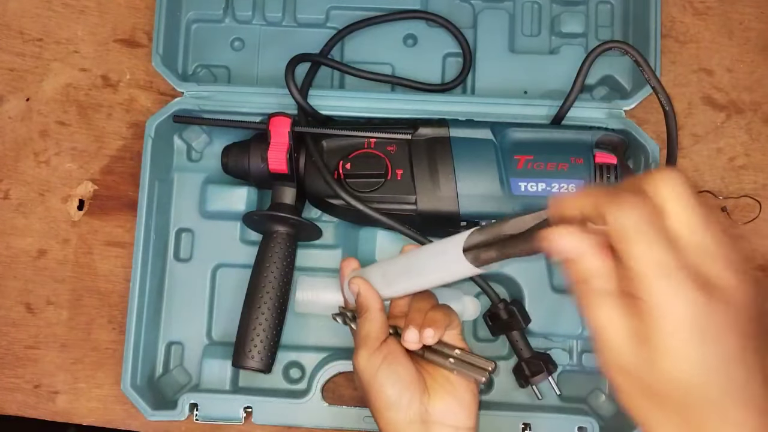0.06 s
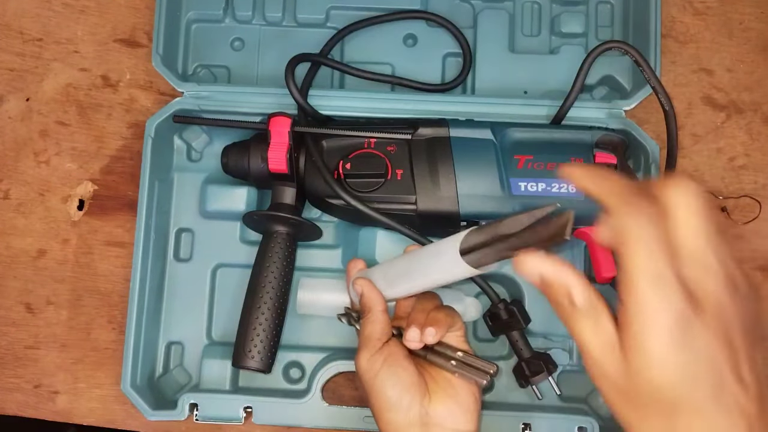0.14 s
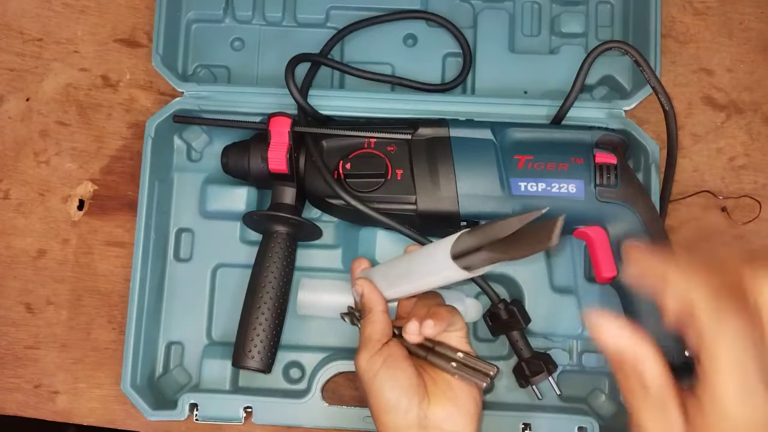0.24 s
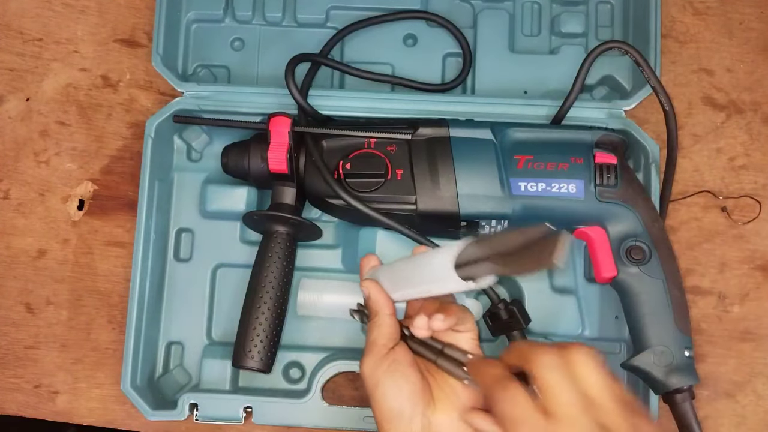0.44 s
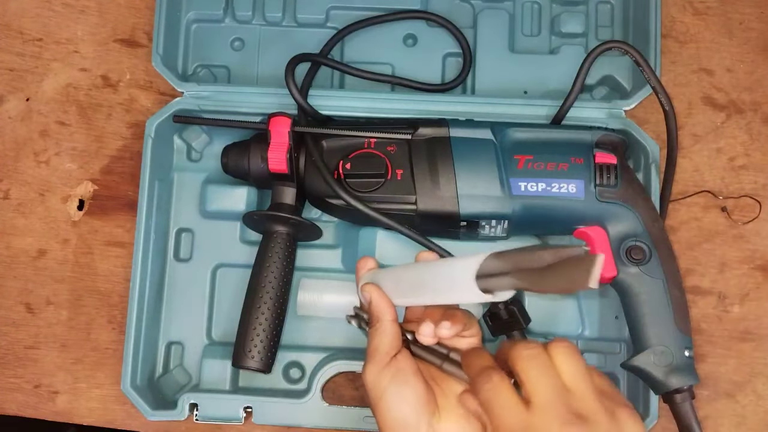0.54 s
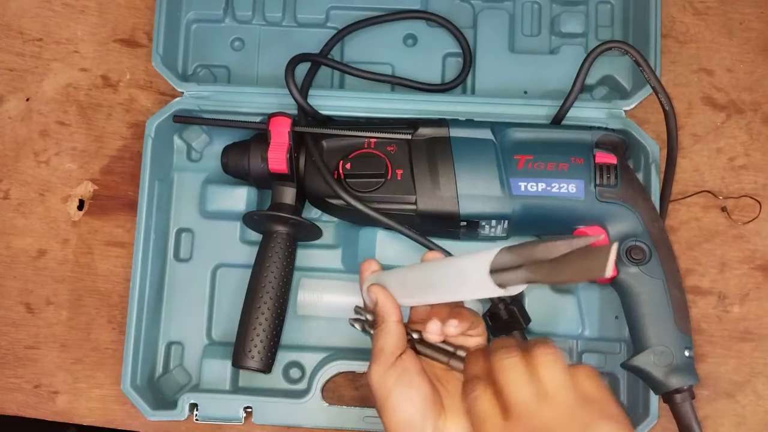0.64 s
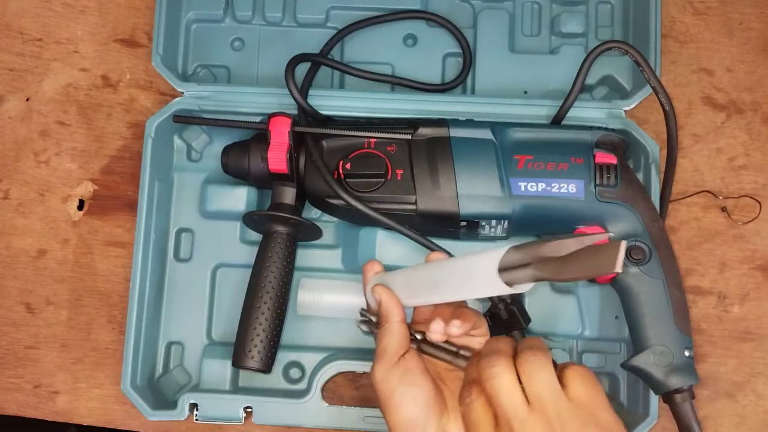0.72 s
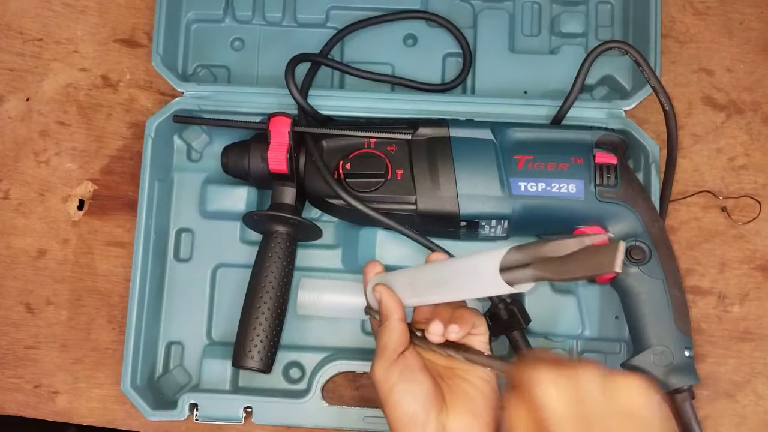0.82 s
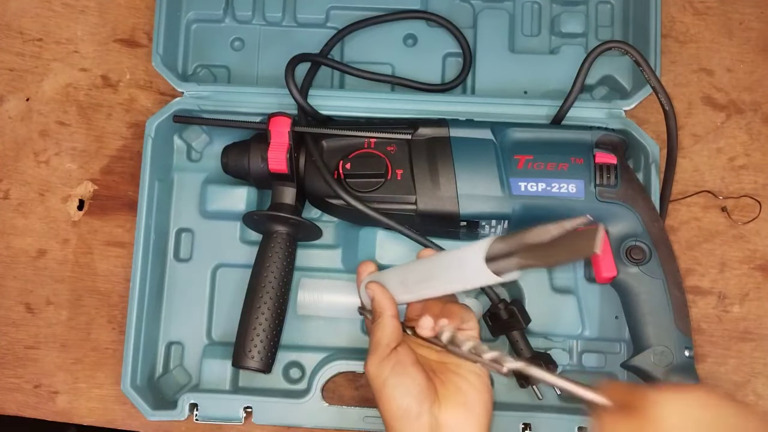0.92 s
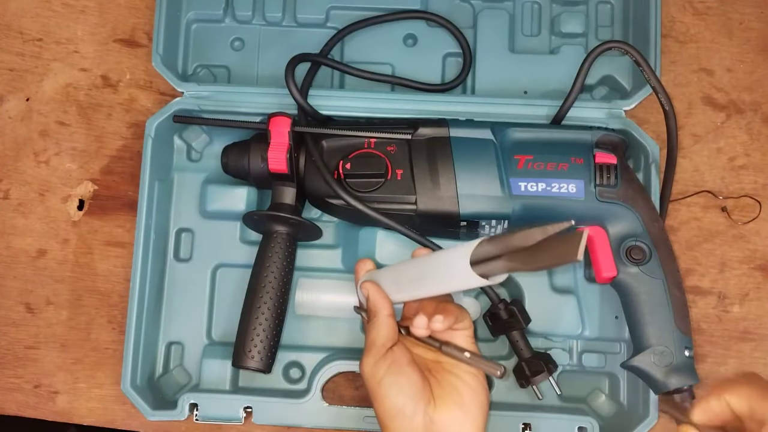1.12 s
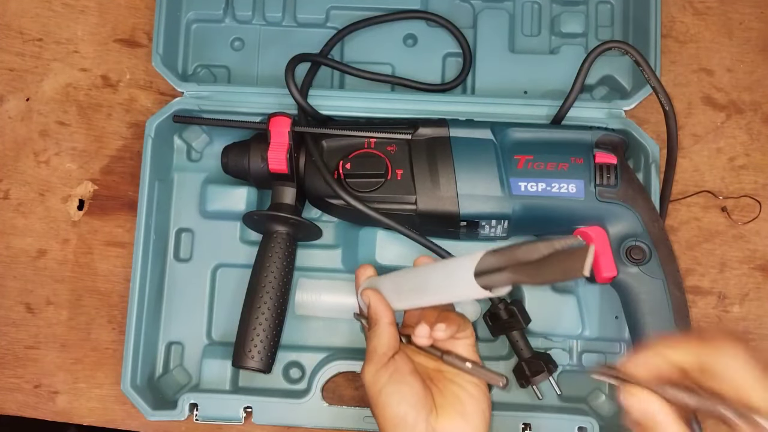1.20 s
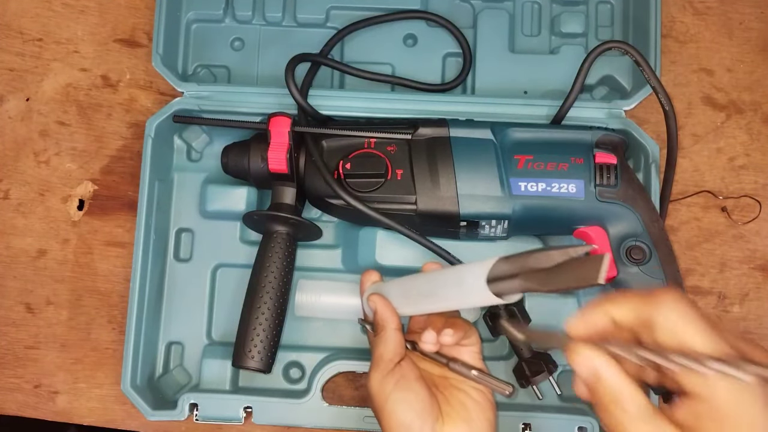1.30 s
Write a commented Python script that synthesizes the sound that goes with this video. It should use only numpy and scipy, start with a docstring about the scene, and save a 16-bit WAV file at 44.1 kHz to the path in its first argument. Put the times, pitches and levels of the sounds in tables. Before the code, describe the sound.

A light metallic clink and scrape leads into a bright, loud chatter of steel bits on a chisel, with low case knocks; later faint ticks and a soft rattle, heard closely indoors.

```python
"""Steel drill bits are laid against a chisel over a plastic tool case, close to the microphone in a small room.
First come a clink and a light scrape, then a loud chattering clatter with dull knocks of the case.
After a pause with faint ticks and a soft slide, a short bit is touched, rattles as it is lifted, and slides.
Each contact is impulsive excitation: coloured noise bursts for the impact, damped modes for the ringing steel
or shell; sliding is noise with random fine catches, and all contacts excite the reverberation of the room."""
import sys
import numpy as np
from scipy import signal
from scipy.fft import rfft, irfft
from scipy.io import wavfile

SR = 44100
rng = np.random.default_rng(int(sys.argv[2]) if len(sys.argv) > 2 else 0)


def transcribe(signal):
    """Save signal, clipped to [-1, 1], as a 16-bit WAV file at the path in sys.argv[1]."""
    frames = np.atleast_2d(signal).T
    limited = np.clip(frames, -1, 1)
    pcm = np.round(limited * 32767).astype(np.int16)
    wavfile.write(sys.argv[1], SR, pcm)


N = 59535  # samples, 1.35 s

# natural modes of each piece, in three rows: (frequency [Hz], relative level [dB], t60 [s])
CHISEL_MODES = [
    [1550, 1680, 3345, 3606, 6314, 7415, 7738, 11590, 11724, 12957, 13294, 14812],
    [-20, -24, -20, -19, -14, -5, -11, 0, -5, -18, -19, -19],
    [.1, .1, .15, .14, .11, .16, .1, .14, .13, .12, .13, .12],
]
LONG_BIT_MODES = [
    [2975, 3312, 3530, 4877, 7416, 7455, 7845, 7873, 9598, 11234, 11586, 12750, 13980, 14798],
    [-24, -14, -21, -18, 0, -6, -10, -3, -21, -20, -13, -26, -21, -16],
    [.16, .14, .2, .17, .14, .19, .14, .17, .15, .11, .15, .1, .18, .11],
]
THIN_BIT_MODES = [
    [1560, 3040, 3400, 4610, 4870, 6065, 6290, 7335, 7780, 7868, 9593, 9795, 11216, 12960],
    [-10, -14, -13, -14, -9, -6, -1, -2, -6, -2, -1, -1, -7, -15],
    [.11, .15, .18, .08, .14, .2, .12, .2, .14, .18, .14, .21, .11, .11],
]
SHORT_BIT_MODES = [
    [1340, 1605, 1672, 4222, 4680, 4712, 5070, 8070, 8252, 8472, 8890, 10330, 12805, 13560, 13640],
    [-32, -23, -30, -16, -12, -6, -23, -4, -4, 0, -18, -24, -18, -23, -25],
    [.13, .18, .2, .13, .13, .27, .1, .19, .12, .15, .12, .08, .16, .11, .11],
]
LOOSE_BIT_MODES = [
    [1668, 4344, 4460, 4640, 5010, 8253, 8457, 8800, 12850, 13600],
    [-13, -4, -4, -6, -9, -5, -3, -9, -19, -18],
    [.15, .17, .07, .04, .05, .09, .28, .06, .18, .1],
]
CASE_MODES = [
    [290, 450, 478, 560, 1080, 1290, 1590],
    [-23, -4, -1, -12, -11, -8, -12],
    [.1, .11, .11, .08, .08, .09, .08],
]

# contacts in the bundle: (time [s], crack level [dB], chisel [dB], long bit [dB], thin bit [dB])
BUNDLE_CONTACTS = [(.0884, -24.5, -38.5, -48, -30), (.0965, -24, -42.5, -38.5, -36.5),
                   (.1225, -40.5, -53, -49.5, -46), (0.136, -42, -50, -51, -51.5),
                   (.1745, -42.5, -44, -42.5, -58.5), (.1935, -34, -38, -49.5, -49.5),
                   (.1981, -43, -39, -51, -56.5), (.216, -52.5, -33, -45.5, -54.5),
                   (.2341, -22.5, -36.5, -26.5, -33.5), (.2382, -25.5, -19, -26.5, -27),
                   (.2418, -13, -6, -29, -31), (.2545, -18, -18.5, -22, -32), (.2635, -21, -21, -25, -34.5),
                   (.2725, -24, -22, -22, -35), (.2765, -20.5, -26, -11.5, -29.5),
                   (.2875, -22, -34, -13, -35.5), (.3005, -24.5, -29, -35.5, -39),
                   (.3092, -23, -27, -19.5, -43.5), (.321, -26, -29.5, -23, -38.5),
                   (.3405, -19, -29.5, -21.5, -26), (.3535, -32.5, -30.5, -19, -25.5),
                   (.371, -31, -34, -30, -30.5), (.3748, -22, -43, -17, -32),
                   (.3935, -23.5, -35, -28.5, -62), (.409, -31, -57, -69, -67), (.4245, -53, -71, -36, -38)]
# contacts of the short bit: (time [s], crack level [dB], ring level [dB], treble tilt [dB/octave])
SHORT_BIT_CONTACTS = [(.486, -74, -58.5, -3.5), (0.804, -61.5, -60, -10.5), (0.82, -75, -59.5, -8.5),
                      (0.836, -59, -41.5, -4), (0.8614, -41, -35, 1.5), (0.8681, -58, -22.5, 5.5),
                      (0.8881, -31, -38.5, -3), (0.9026, -45, -46.5, -8), (0.9205, -43, -41.5, -2),
                      (.9505, -56, -72, 27), (0.952, -50.5, -55, -1)]
# knocks on the case: (time [s], level [dB])
CASE_KNOCKS = [(0.2409, -31), (0.277, -42), (0.3414, -27.5), (0.393, -41.5)]
# lasting steps in the bundle's ring as pieces press together, negative ones choke it: (time [s], change [dB])
RING_STEPS = [(.298, 5.5), (.328, -1), (.356, -12.5), (.382, -12), (.397, -22), (.428, -24)]
# steel sliding on steel in the bundle: (start [s], length [s], level [dB])
BUNDLE_SCRAPES = [(0.092, 0.084, -43), (.176, .06, -42.5), (.236, 0.11, -29.5), (0.34, 0.091, -39)]
# small bits sliding under the fingers: (start [s], length [s], level [dB])
SMALL_BIT_SLIDES = [(.565, 0.09, -71), (.815, 0.11, -54.5), (.862, 0.072, -46), (1.025, 0.045, -71.5)]

# spectrum of a contact in the bundle: (frequency [Hz], relative level [dB])
BUNDLE_CRACK_COLOUR = [(50, -52), (350, -23.5), (550, -21), (750, -21.5), (1100, -13), (1500, -6.5),
                       (2200, -11), (3400, -6), (5200, -8), (6800, -0.5), (7600, 12), (8800, -1),
                       (10500, -9.5), (11800, -1), (13500, -14.5), (15500, -24.5)]
# spectrum of a small bit's contact or slide: (frequency [Hz], relative level [dB])
SMALL_BIT_COLOUR = [(200, -9.5), (1000, -26), (1600, -6.5), (3200, -17), (4600, 3), (6200, -12),
                    (7400, -1.5), (8400, 6.5), (9500, -5.5), (11800, -12), (13500, -11), (15000, -28)]
# spectrum of sliding in the bundle, showing the chisel's resonances: (frequency [Hz], relative level [dB])
RUB_COLOUR = [(50, -40.5), (500, -11), (750, -17.5), (1150, -2.5), (1350, -3.5), (1600, 3), (1950, -12),
              (2600, -8.5), (3450, 7), (4200, -9.5), (4900, 0), (5600, -10.5), (7600, 6.5), (8800, -8),
              (10500, -7.5), (11700, -1.5), (13500, -16), (15500, -19)]
# spectrum of the burst in a case knock: (frequency [Hz], relative level [dB])
THUD_COLOUR = [(40, -26), (150, -12), (300, -9), (480, 1), (750, -7), (1250, -3), (2500, -14), (8000, -35)]
# spectrum of the steady background: (frequency [Hz], relative level [dB])
AIR_COLOUR = [(12, -31), (20, 5), (70, -1), (140, -26), (274, -18), (478, -25), (597, -23), (881, -29),
              (1100, -28.5), (1670, -32.5), (2540, -36.5), (4680, -42), (5690, -41.5), (8170, -37.5),
              (15500, -48)]

AIR_DB = -54.5
ROOM_T60_S, ROOM_DB, ROOM_GAP_S = .23, -8.5, .003
SCRAPE_GRAIN_S, SCRAPE_ROUGH_DB = .0012, -.5  # hold time of a catch, level change per unit of random force
CRACK_T60_S, CHATTER_T60_S, CHATTER_DB = .017, .12, -14  # chatter relative to the crack
THUD_T60_S, THUD_DB = .025, -4  # relative to the knock
STRIKE_SCATTER_DB = .48  # each contact lands on another spot
DETUNE = .0016  # fraction: changing pressure shifts the modes a little at each contact
RING_STEP_TIME_S = .008
NUDGE_S, NUDGE_CRACK_DB, NUDGE_RING_DB = .668, -43, -49
CEILING, TOP_HZ = .92, 15450


def undb(db):
    """Level is logarithmic: convert decibels to an amplitude ratio."""
    return 10 ** (np.asarray(db) / 20)


def fade(t60):
    """Exponential decay: start at 1 and fall by 60 dB in t60 seconds."""
    return np.exp(-np.log(1000) * np.arange(N) / SR / max(t60, 1e-3))


def noise(colour):
    """Spectral shaping: filter white noise to a coloured one of rms 1."""
    hz, db = np.array(colour).T
    bins_hz = np.fft.rfftfreq(N, 1 / SR)
    gain = undb(np.interp(np.log(bins_hz + 1), np.log(hz), db))
    y = irfft(rfft(rng.standard_normal(N)) * gain, N)
    return y / y.std()


def add(out, start_s, x):
    """Superposition: mix x into out from start_s on."""
    i = int(start_s * SR)
    out[i:] += x[:N - i]


def ring(modes, times, dbs, tilts_db=0, steps=()):
    """Modal superposition: each contact adds energy to the damped modes, and steps change their level."""
    hz, db, t60 = np.array(modes)
    scatter, side, detune = rng.standard_normal((3, len(times), len(hz)))
    tilt_db = np.outer(tilts_db, np.log2(hz / np.median(hz)))
    kicks = undb(db + dbs[:, None] + tilt_db + STRIKE_SCATTER_DB * scatter)
    decay = np.log(1000) / np.maximum(t60, 1e-3)
    poles = 2j * np.pi * hz * (1 + DETUNE * detune) - decay
    edges = np.append((times * SR).astype(int), N)
    out = np.zeros(N)
    state = np.zeros(len(hz), complex)
    for a, b, kick, pole, sign in zip(edges, edges[1:], kicks, poles, np.sign(side)):
        # a kick at right angles to the present phase makes the energies add
        state = state + 1j * sign * kick * np.exp(1j * np.angle(state))
        t = np.arange(max(b - a, 0) + 1) / SR
        step_db = np.zeros(len(t))
        for start_s, change_db in steps:
            step_db += change_db * np.clip((a / SR + t - start_s) / RING_STEP_TIME_S, 0, 1)
        step_gain = undb(step_db - step_db[0])  # earlier change is already in the state
        swing = state * np.exp(np.outer(t, pole)) * step_gain[:, None]
        out[a:b] = swing[:-1].real.sum(1)
        state = swing[-1]
    return out


def bursts(times, dbs, shape, colour):
    """Incoherent summation: the noise bursts of all contacts add in power."""
    power = np.zeros(N)
    for start_s, db in zip(times, dbs):
        add(power, start_s, (undb(db) * shape) ** 2)
    return np.sqrt(power) * noise(colour)


def cracks(times, dbs, colour):
    """Two-stage decay: steel meets steel in a sharp crack, then fine chatter as the surfaces settle."""
    shape = fade(CRACK_T60_S) + undb(CHATTER_DB) * fade(CHATTER_T60_S)
    return bursts(times, dbs, shape, colour)


def air():
    """Stationary random noise: a steady coloured background."""
    return undb(AIR_DB) * noise(AIR_COLOUR)


def room(x):
    """Diffuse reverberation: convolve with exponentially decaying noise and add it to the direct sound."""
    tail = np.zeros(N)
    add(tail, ROOM_GAP_S, rng.standard_normal(N) * fade(ROOM_T60_S))
    tail /= np.linalg.norm(tail)
    return x + undb(ROOM_DB) * signal.fftconvolve(x, tail)[:N]


def scrapes(strokes, colour):
    """Sliding friction: surfaces catch densely and at random while each stroke swells and fades."""
    t = np.arange(N) / SR
    envelope = np.zeros(N)
    for start_s, length_s, db in strokes:
        progress = np.clip((t - start_s) / length_s, 0, 1)
        envelope += undb(db) * np.sqrt(np.sin(np.pi * progress))
    grain = (t / max(SCRAPE_GRAIN_S, 1 / SR)).astype(int)
    catches = rng.standard_normal(N)[grain]
    return envelope * undb(SCRAPE_ROUGH_DB * catches) * noise(colour)


def loose_bit():
    """Impulse response: a fingertip tips a loose bit against its neighbour for one faint tick."""
    times = np.array([NUDGE_S])
    crack = cracks(times, [NUDGE_CRACK_DB], SMALL_BIT_COLOUR)
    return crack + ring(LOOSE_BIT_MODES, times, np.array([NUDGE_RING_DB]))


def case():
    """Shell resonance: hollow plastic answers a knock with low, quickly damped modes and a thud."""
    times, db = np.array(CASE_KNOCKS).T
    thuds = bursts(times, db + THUD_DB, fade(THUD_T60_S), THUD_COLOUR)
    return ring(CASE_MODES, times, db) + thuds


def short_bit():
    """Repeated impact: a short bit rattles as it is lifted, each contact with its own treble tilt."""
    times, crack_db, ring_db, tilt_db = np.array(SHORT_BIT_CONTACTS).T
    crack = cracks(times, crack_db, SMALL_BIT_COLOUR)
    return crack + ring(SHORT_BIT_MODES, times, ring_db, tilt_db)


def bundle():
    """Shared excitation: two bits and the chisel bounce together in the hand, and all three ring."""
    times, crack_db, *ring_dbs = np.array(BUNDLE_CONTACTS).T
    out = cracks(times, crack_db, BUNDLE_CRACK_COLOUR)
    for modes, db in zip((CHISEL_MODES, LONG_BIT_MODES, THIN_BIT_MODES), ring_dbs):
        out += ring(modes, times, db, steps=RING_STEPS)
    return out


def scene():
    """Linear superposition: all contacts sound in the room, above the steady background."""
    sliding = scrapes(BUNDLE_SCRAPES, RUB_COLOUR) + scrapes(SMALL_BIT_SLIDES, SMALL_BIT_COLOUR)
    contacts = loose_bit() + case() + short_bit() + bundle()
    return (air() + room(sliding + contacts))[None]


def record(dry):
    """Saturation and band limiting: the recorder rounds the highest peaks and cuts the top."""
    rounded = CEILING * np.tanh(dry / CEILING)
    lowpass = signal.ellip(10, .2, 80, TOP_HZ, fs=SR, output="sos")
    return signal.sosfilt(lowpass, rounded)


dry = scene()
out = record(dry)
transcribe(out)
```